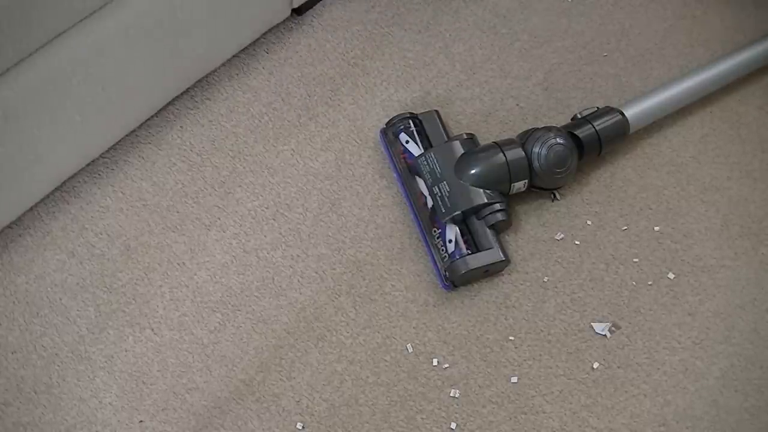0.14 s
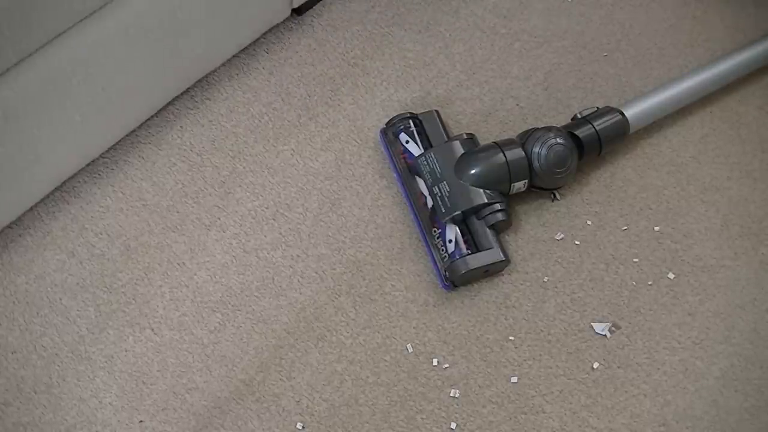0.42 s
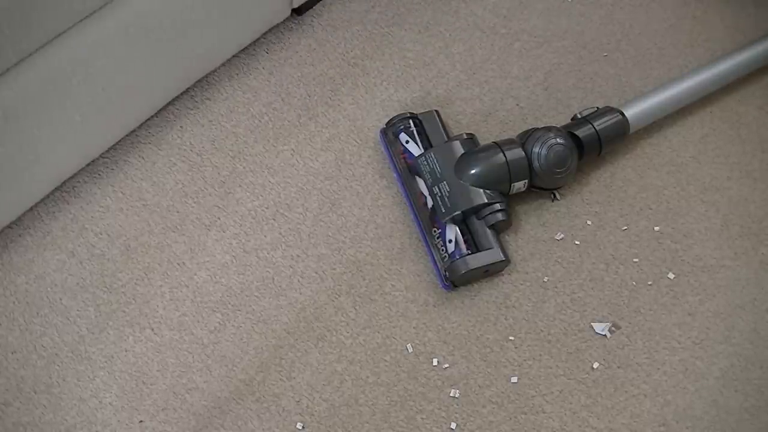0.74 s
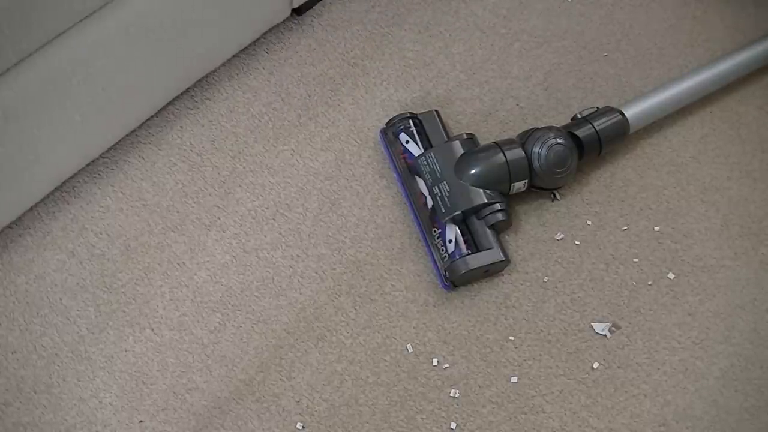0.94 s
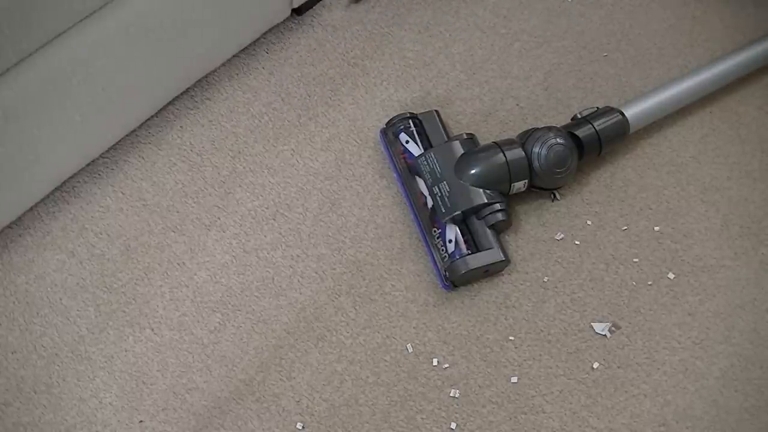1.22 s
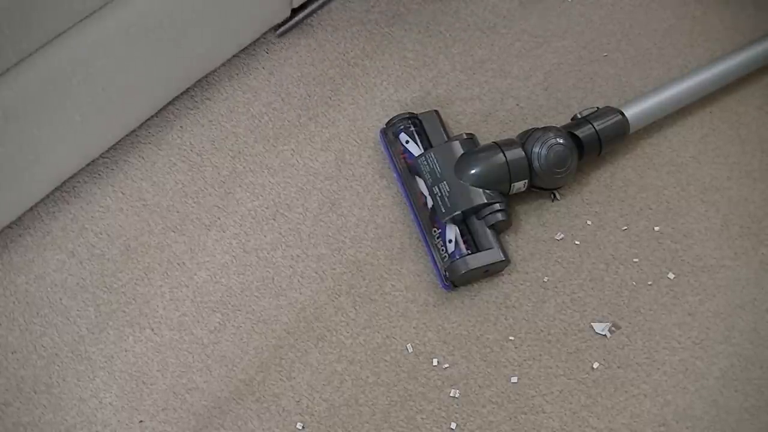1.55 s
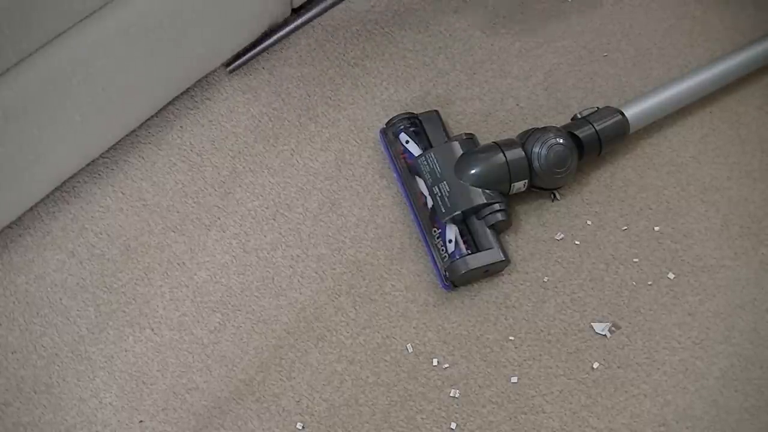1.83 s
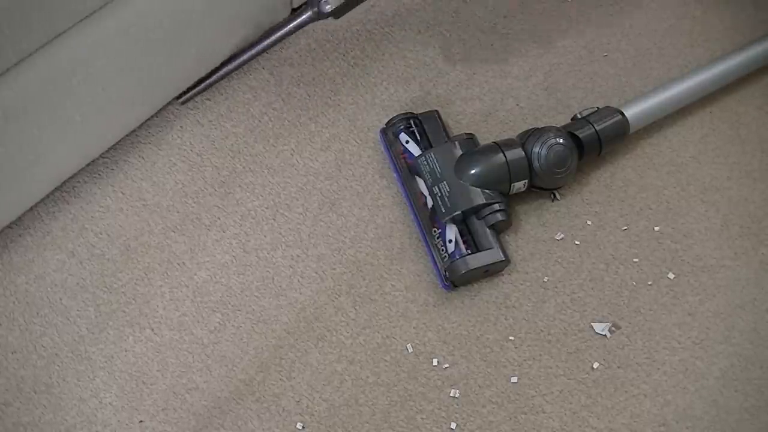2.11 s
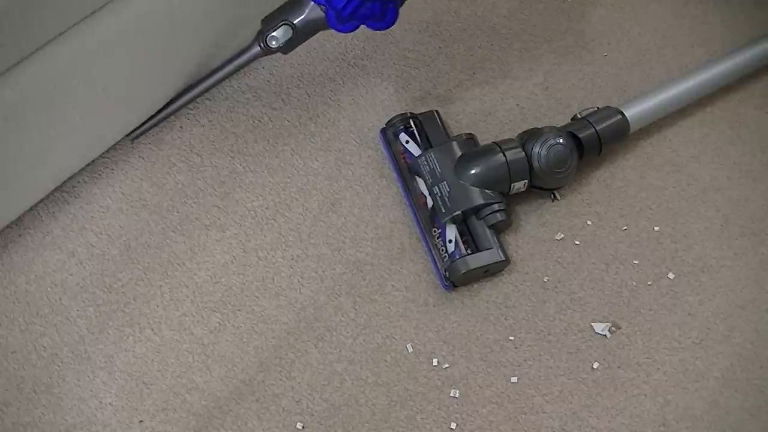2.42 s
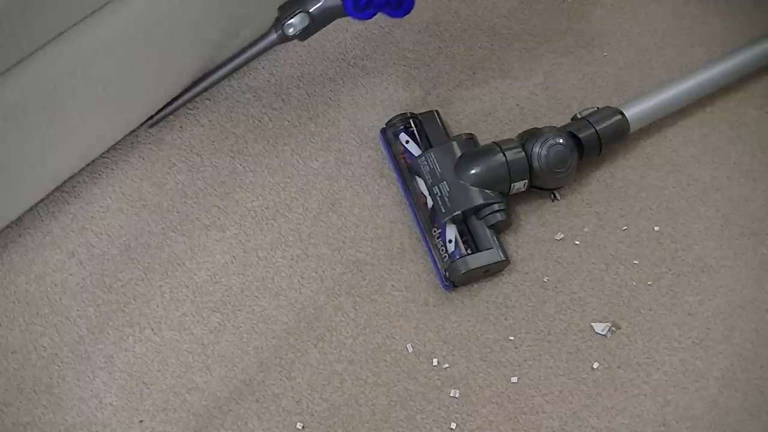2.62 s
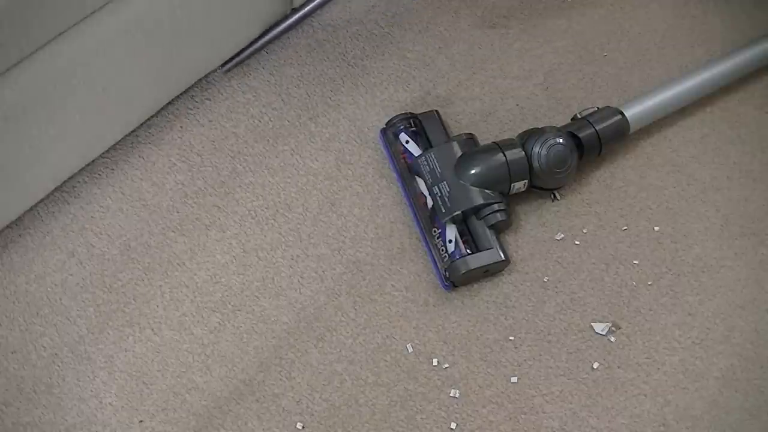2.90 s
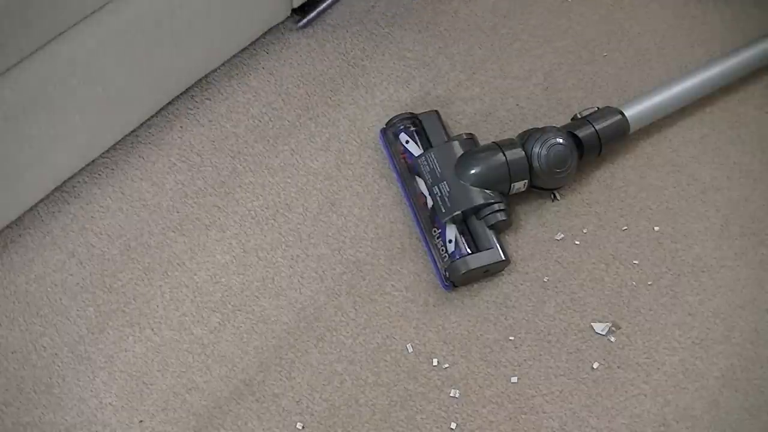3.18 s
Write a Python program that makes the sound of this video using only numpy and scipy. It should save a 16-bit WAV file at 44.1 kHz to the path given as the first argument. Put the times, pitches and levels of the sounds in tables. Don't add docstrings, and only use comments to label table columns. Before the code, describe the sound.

A handheld vacuum cleaner rushes and whines steadily, then switches off with a falling whirr and clack.

```python
import sys
import numpy as np
from scipy import signal
from scipy.fft import rfft, irfft
from scipy.io import wavfile
from scipy.ndimage import uniform_filter1d

SR = 44100
rng = np.random.default_rng(int(sys.argv[2]) if len(sys.argv) > 2 else 0)


def voltage_ratio(decibels):
    exponent = np.asarray(decibels, float) / 20
    return 10 ** exponent


def unload_wav(signal):
    wavfile.write(
        sys.argv[1],
        SR,
        np.round(np.clip(np.atleast_2d(signal).T, -1, 1) * 32767).astype(np.int16),
    )


N = 147735
T = np.arange(N) / SR

# time in seconds, share of full speed (0-1).
SHAFT_SPEED = [(0, .996), (.25, .9995), (.45, 1.002), (.7, .998), (1.35, .9975), (1.48, 1.003),
               (1.7, 1.0015), (1.9, 1.0), (2.35, 1.001), (3.018, .9985), (3.065, .795), (3.11, .59),
               (3.145, .465), (3.165, .39), (3.2, .26), (3.25, .11), (3.29, .03)]
# time in seconds, air level in dB, nearness (0-1).
NOZZLE = [(0, -19, 0.48), (.45, -18, 0.19), (.75, -18.5, 0.3), (1.0, -18.5, 0.35), (1.2, -18, 0.05),
          (1.45, -18, 0.72), (1.65, -19, 0.6), (1.9, -18, .8), (2.15, -17, 0.94), (2.4, -17, 1),
          (2.6, -17, 1), (2.8, -17, 0.85), (3.02, -18, 1)]
# frequency in Hz, level in dB per Hz.
FAR_AIR = [(24, -70), (40, -38), (689, -9), (761, -8.5), (1110, -9.5), (2070, -10), (4480, -3.5),
           (7950, -5.5), (15600, -18.5)]
# frequency in Hz, level in dB per Hz.
NEAR_AIR = [(24, -71), (40, -42), (1160, -4), (1870, -5.5), (4710, -4.5), (7020, -6.5), (7950, -5),
            (13800, -14), (15600, -31)]
# centre in Hz, width in Hz, boost far in dB, boost near in dB.
DUCT_MODES = [(154, 43, 5, 5.5), (905, 130, 0.5, 3.5), (1110, 350, 5, -3), (1674, 130, 4.5, 0),
              (1890, 100, 0, -6), (2290, 120, 2.5, 3), (2880, 360, -1, 2), (3530, 300, -0.5, 3.5),
              (4600, 320, -5.5, 4.5), (5660, 540, -1.5, 4), (7060, 920, 0.5, -3.5), (7690, 520, 2, 3.5),
              (9130, 570, 5, 3.5), (10040, 200, -5.5, 5)]
# centre in Hz, width in Hz, boost in dB.
CORNER_MODES = [(150, 16, 3.5), (190, 13, 2.5), (273, 23, 6), (415, 18, -14), (440.6, 19, 9),
                (704, 18, 3.5), (882, 13, -1), (1490, 99, 2), (1703, 21, 5)]
# time in seconds, centre in Hz, boost in dB.
SLOT_WHISTLE = [(0, 4370, -9), (.1, 4530, 9), (.22, 4600, 7), (.29, 4800, 4), (.38, 4770, 12),
                (.48, 4900, 6), (.58, 4560, 11.5), (.7, 4470, 8.5), (.85, 4600, 11), (1.05, 4380, 9),
                (1.2, 4600, 4.5), (1.5, 4600, 2.5), (2.3, 4530, -5.5), (2.42, 4800, 2.5), (2.7, 4700, 1.5),
                (2.85, 4650, -7)]
# time in seconds, centre in Hz, boost in dB.
LIP_TONE = [(.2, 12600, 6), (.52, 12300, 10), (.64, 12900, 12), (.68, 12300, 0), (.72, 11900, 7),
            (.85, 12200, 1), (.92, 12600, -4), (1.02, 12200, -3), (1.2, 12400, 10), (1.35, 12500, 1)]
# centre in Hz, width in Hz, boost in dB,
# share of full speed where the drone dies (0-1).
DYING_DRONES = [(900, 200, 8, .42), (540, 200, 5, .1), (170, 220, 6, .1), (1250, 350, -6, .1)]
# time in seconds, level in dB.
SHAFT_WHINE = [(0, -37), (.09, -35), (.4, -34), (.6, -35), (.82, -34), (1.0, -37), (1.12, -40), (1.3, -36),
               (1.39, -39), (1.47, -32), (1.6, -38), (1.78, -40), (1.87, -52), (2.1, -46), (2.3, -36),
               (2.5, -35), (2.75, -39), (3.0, -46)]
# time in seconds, level in dB.
BLADE_WHINE = [(0, -30), (.1, -36), (.18, -38), (.25, -28), (.55, -30), (.68, -37), (1.0, -42), (1.12, -31),
               (1.25, -38), (1.38, -28), (1.45, -35), (1.7, -31), (1.9, -31), (2.1, -31), (2.3, -29),
               (2.6, -27.5), (2.85, -29), (3.0, -29.5)]
# multiple of the shaft speed, level far in dB, level near in dB.
OTHER_WHINES = [(2, -49, -40), (4, -44, -45), (8, -46, -44), (9, -52, -45), (14, -37, -37), (21, -42, -42)]
# frequency in Hz, level in dB.
HOUSING_RING = [(4000, -26), (5500, -14), (6300, -2), (7400, -3), (9300, 2), (10300, -14), (12000, -10),
                (12800, 5), (14500, 2), (15800, -9)]
# start in seconds, level in dB, brightness in dB.
FLAP_HITS = [
    (3.2720, -31.5, -14),
    (3.2737, -34, -16),
    (3.2778, -33, -13),
    (3.2855, -41, -6),
    (3.2975, -44, -2),
    (3.3055, -44, -10),
    (3.317, -48, 2),
]
# pitch in Hz, level in dB, time to fade by 60 dB in seconds.
FLAP_MODES = [(560, -9, .014), (950, -12, .011), (1450, -4, .011), (1950, -1, .012), (2300, 0, .012),
              (2950, -3, .008), (3550, -3, .011), (4150, -3, .009), (4800, -6, .006), (5500, -4, .008),
              (6300, -9, .005)]
# start in seconds, level in dB, pitch in Hz, time to fade by 60 dB in seconds.
KNOCK_TONES = [
    (1.402, -25, 180, .045),
    (1.402, -22, 275, .055),
    (1.404, -21, 870, .03),
    (1.404, -23, 1430, .025),
    (3.017, -21, 2900, .03),
    (3.017, -23, 1550, .025),
    (3.116, -27, 380, .03),
    (3.116, -26, 900, .03),
]
# frequency in Hz, level in dB per Hz.
ROOM_HISS = [(35, -42), (60, 2), (199, -4.5), (711, -5), (1920, -15), (4840, -15), (15000, -32)]
# centre in seconds, half length in seconds.
SCAN_MOMENTS = [
    (.06, .05),
    (0.603, .06),
]
# centre in seconds, lowest and highest frequency in Hz.
STEREO_SPLITS = [(.09, 4600, 5750), (.461, 5100, 6350), (.461, 6850, 8950), (.786, 14400, 15700),
                 (.833, 11600, 14450), (1.042, 13700, 15150), (1.134, 4600, 5750), (1.134, 8850, 10350),
                 (1.343, 13100, 15700), (1.947, 4600, 5700), (1.947, 6850, 8300), (1.994, 8250, 9750),
                 (1.994, 10300, 12450), (2.295, 4150, 5200), (2.295, 5650, 6950), (2.504, 9600, 11800),
                 (2.504, 12350, 14500), (2.528, 5650, 6950), (2.528, 13050, 14500), (2.853, 11650, 14500)]


def air(speed):
    frames = dict(nperseg=2048, noverlap=1536)
    hz, t, noise = signal.stft(rng.standard_normal(N), SR, **frames)
    hz = np.maximum(hz, 20)[:, None]

    def at(values):
        return np.interp(t, T, values)[None]

    def bump(centre_hz, width_hz):
        return np.exp(-.5 * ((hz - centre_hz) / (width_hz / 2)) ** 2)

    def patches(bins, frames):
        p = rng.standard_normal(noise.shape)
        for _ in range(2):
            p = uniform_filter1d(p, bins, axis=0)
            p = uniform_filter1d(p, frames, axis=1)
        return p / p.std()

    near, turning = at(nearness()), at(speed)
    close_colour = colour(NEAR_AIR, hz) + 2 * bump(13000, 1200)
    db = (1 - near) * colour(FAR_AIR, hz) + near * close_colour
    for centre, width, far_db, near_db in DUCT_MODES:
        db = db + bump(centre, width) * ((1 - near) * far_db + near * near_db)
    for centre, width, boost in CORNER_MODES:
        db = db + bump(centre, width) * boost

    whistle_db = at(curve(SLOT_WHISTLE, col=2)) + 1.7 * at(walk(13))
    db = db + bump(at(curve(SLOT_WHISTLE)), 250) * whistle_db
    db = db + bump(at(curve(LIP_TONE)), 320) * at(curve(LIP_TONE, col=2))

    slowing = np.sqrt(np.clip(1 - turning, 0, 1))
    for centre, width, boost, end in DYING_DRONES:
        db = db + bump(centre, width) * boost * np.tanh((turning / end) ** 3) * slowing

    db = db + 1.1 * patches(bins=9, frames=12)
    db = db + .6 * patches(bins=60, frames=3)
    db = db + 2.15 * patches(bins=2, frames=22)
    flow = signal.istft(noise * voltage_ratio(db), SR, **frames)[1][:N]
    flow = flow / np.sqrt(uniform_filter1d(flow ** 2, size=SR // 3))
    flow = flow * voltage_ratio(curve(NOZZLE) + .3 * walk(8.5))

    low = signal.sosfiltfilt(signal.butter(2, 1000, fs=SR, output="sos"), flow)
    top = signal.sosfiltfilt(signal.butter(1, 7000, "highpass", fs=SR, output="sos"), flow)
    middle = flow - low - top
    low_fade = np.tanh((speed / .52) ** 1.85)
    return low * low_fade + middle * speed ** 1.82 + top * speed ** 3.1


def whine(speed):
    shaft_hz, wander = 1130.0, .0006
    turn = 2 * np.pi * np.cumsum(shaft_hz * speed * (1 + wander * walk(12))) / SR
    near = nearness()
    tones = [(1, curve(SHAFT_WHINE)), (7, curve(BLADE_WHINE))]
    for multiple, far_db, near_db in OTHER_WHINES:
        tones.append((round(multiple), far_db + (near_db - far_db) * near))
    out = 0
    for multiple, db in tones:
        hz = multiple * shaft_hz * speed
        if multiple > 10:
            fade = speed ** 0.99 * voltage_ratio(colour(HOUSING_RING, hz))
            fade = fade * np.clip((15650 - hz) / 300, 0, 1)
        else:
            fade = speed ** 6
        if multiple > 20:
            fade = fade * np.clip((hz - 11000) / 1500, 0, 1)
        loudness = np.sqrt(2) * voltage_ratio(db + 1.0 * walk(18)) * fade
        out = out + loudness * np.sin(multiple * turn + .3 * walk(17))
    return out


def flap():
    out, t = 0, np.arange(8000) / SR
    contact = 1 - np.exp(-(t / .0007) ** 2)
    for at, db, bright_db in FLAP_HITS:
        body = 0
        for k, (hz, mode_db, t60) in enumerate(FLAP_MODES):
            strength = voltage_ratio(mode_db + rng.standard_normal()) * (-1) ** k
            body = body + strength * ring(hz * (1 + .03 * rng.standard_normal()), t60)
        crack = band(rng.standard_normal(len(t)), 5700, 13000) * np.exp(-t / 0.0025)
        hit = (body + 2 * voltage_ratio(bright_db) * crack) * contact
        out = out + voltage_ratio(db) * place(hit, at)
    return out


def knocks():
    soft = 1 - np.exp(-np.arange(8000) / SR / 0.0022)
    return sum(voltage_ratio(db) * place(ring(hz, t60) * soft, at) for at, db, hz, t60 in KNOCK_TONES)


def room(x):
    t60, gap = .2, .002
    t = np.arange(SR // 2) / SR
    tail = rng.standard_normal(len(t)) * np.exp(-np.log(1000) * t / t60) * (t > gap)
    tail = signal.lfilter([1], [1, -.2], tail)
    tail = voltage_ratio(-3) * tail / np.sqrt(np.sum(tail ** 2))
    return x + signal.fftconvolve(x, tail)[:N]


def floor():
    hz = np.maximum(np.fft.rfftfreq(N, 1 / SR), 20)
    hiss = irfft(rfft(rng.standard_normal(N)) * voltage_ratio(colour(ROOM_HISS, hz)), N)
    gate = sum(np.exp(-((T - at) / length) ** 4) for at, length in SCAN_MOMENTS)
    return level(hiss, -54) + voltage_ratio(-53) * gate * np.sin(2 * np.pi * 15729 * T)


def curve(table, col=1):
    a = np.array(table, float)
    return np.interp(T, a[:, 0], a[:, col])


def nearness():
    return np.clip(curve(NOZZLE, col=2), 0, 1)


def colour(table, hz):
    a = np.array(table, float)
    return np.interp(np.log(hz), np.log(a[:, 0]), a[:, 1])


def level(x, db):
    return x * voltage_ratio(db) / np.sqrt(np.mean(x ** 2))


def walk(rate):
    k = int(SR / rate)
    steps = np.repeat(rng.standard_normal(N // k + 1), k)
    return 1.3 * uniform_filter1d(uniform_filter1d(steps, k), k)[:N]


def ring(hz, t60, size=8000):
    t = np.arange(size) / SR
    return np.sin(2 * np.pi * hz * t) * np.exp(-np.log(1000) * t / t60)


def place(x, at):
    out, i = np.zeros(N + len(x)), int(at * SR)
    out[i:i + len(x)] = x
    return out[:N]


def band(x, lo_hz, hi_hz):
    return signal.sosfiltfilt(signal.butter(2, [lo_hz, hi_hz], "bandpass", fs=SR, output="sos"), x)


def scene():
    speed = np.clip(curve(SHAFT_SPEED), .001, None)
    mono = air(speed) + whine(speed) + knocks() + room(flap()) + floor()
    return np.array([mono, mono])


def stereo_splits(mono):
    side, late = np.zeros(N), rfft(np.roll(mono, SR // 13))
    hz = np.fft.rfftfreq(N, 1 / SR)
    for at, lo, hi in STEREO_SPLITS:
        bell = np.cos(np.pi / 2 * np.clip((T - at) / .0232, -1, 1)) ** 2
        window = np.sin(np.pi / 2 * bell)
        side += irfft(late * (hz > lo) * (hz < hi), N) * window * voltage_ratio(-3.5)
    return side


def low_pass(x):
    return signal.sosfilt(signal.butter(12, 15730, fs=SR, output="sos"), x)


def record(dry):
    mono = signal.sosfilt(signal.butter(2, 114, "highpass", fs=SR, output="sos"), dry[0])
    mono = mono + level(band(rng.standard_normal(N), 15, 60), -78)
    side = stereo_splits(mono)
    return low_pass(np.array([mono + side, mono - side]))


dry = scene()
out = record(dry)
unload_wav(out)
```